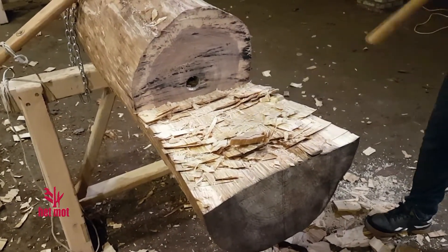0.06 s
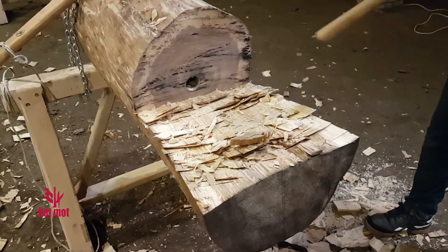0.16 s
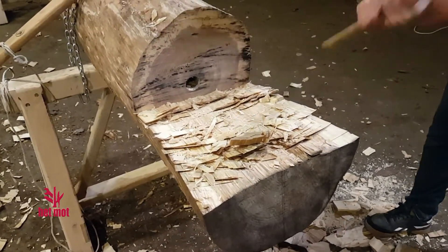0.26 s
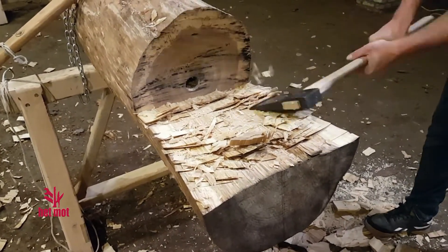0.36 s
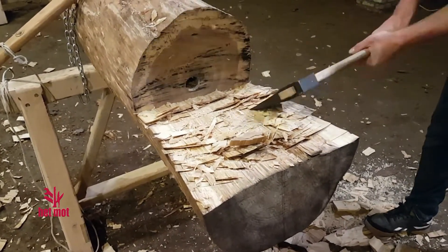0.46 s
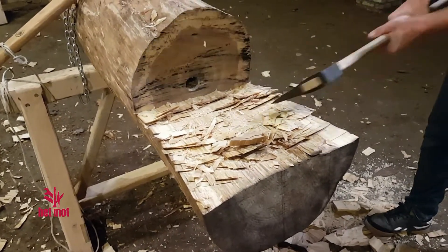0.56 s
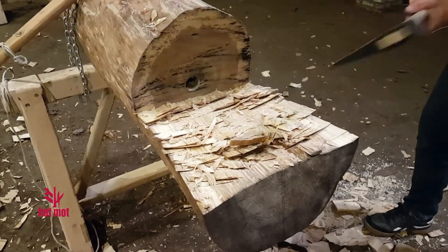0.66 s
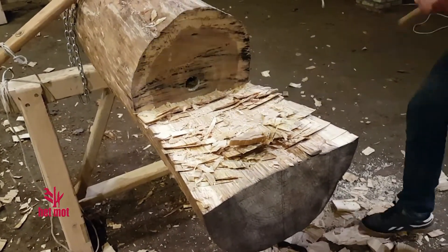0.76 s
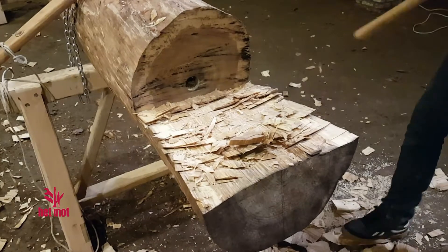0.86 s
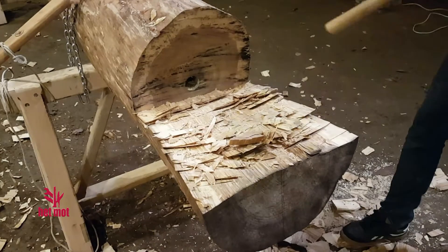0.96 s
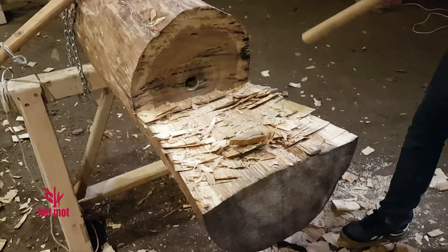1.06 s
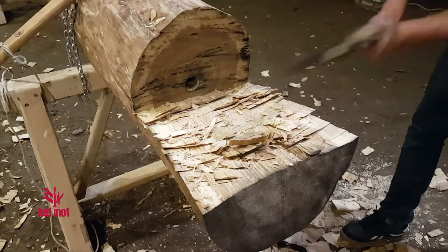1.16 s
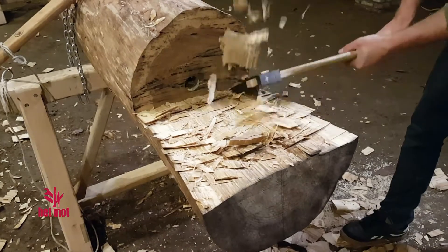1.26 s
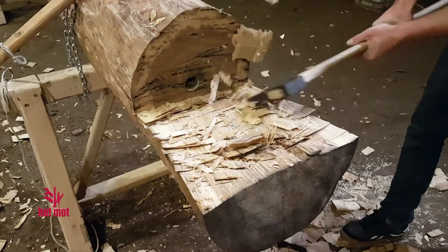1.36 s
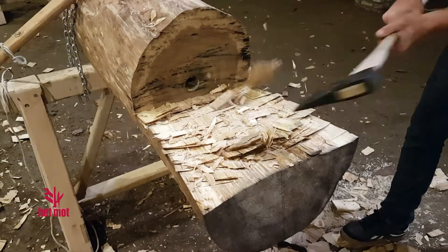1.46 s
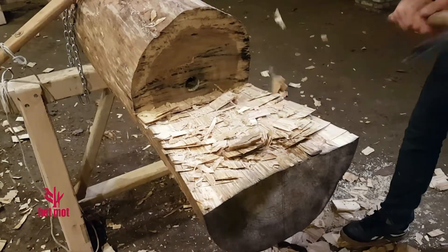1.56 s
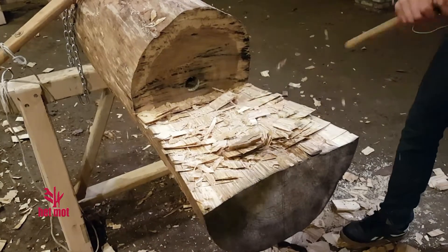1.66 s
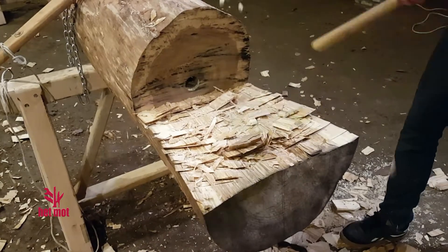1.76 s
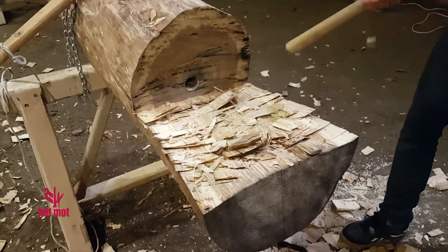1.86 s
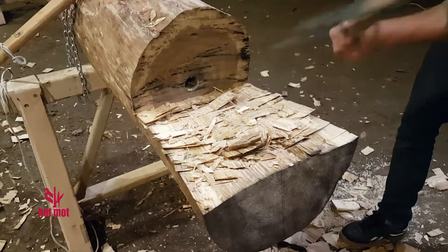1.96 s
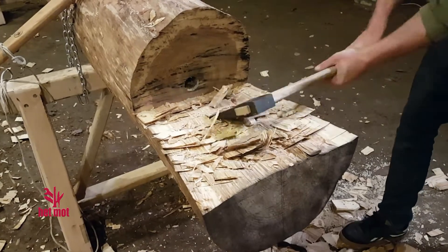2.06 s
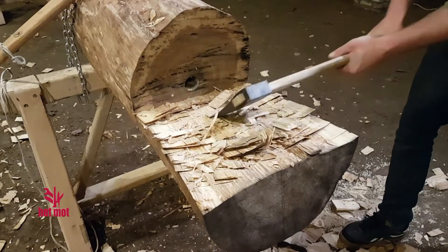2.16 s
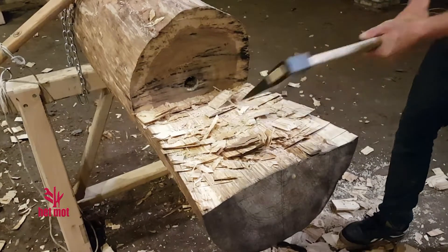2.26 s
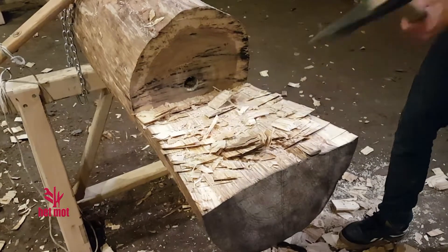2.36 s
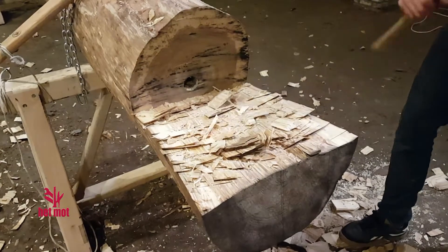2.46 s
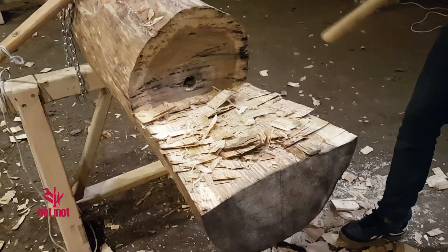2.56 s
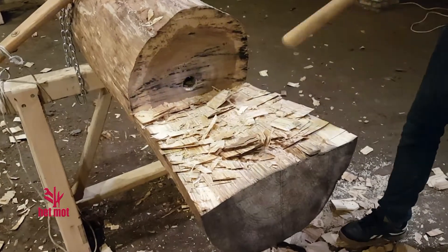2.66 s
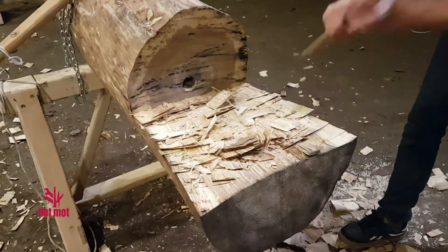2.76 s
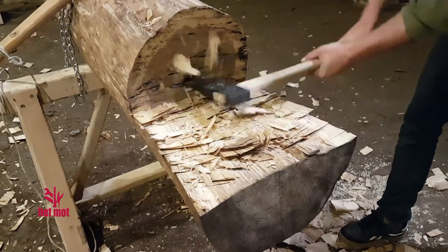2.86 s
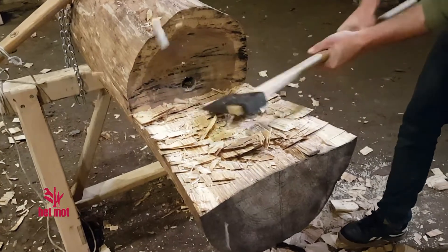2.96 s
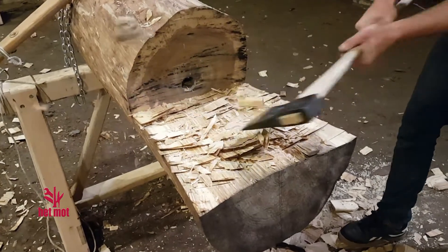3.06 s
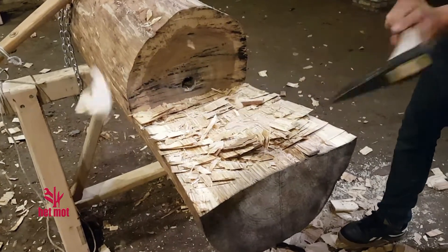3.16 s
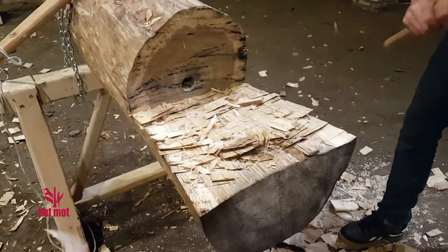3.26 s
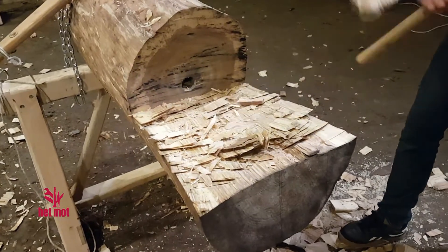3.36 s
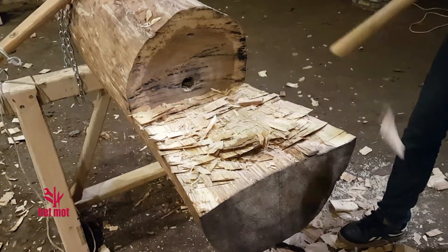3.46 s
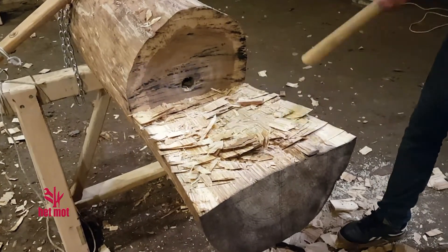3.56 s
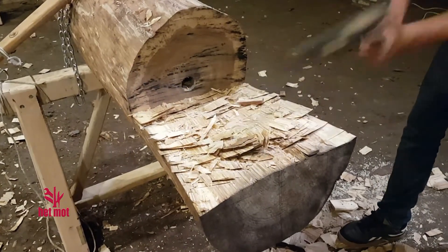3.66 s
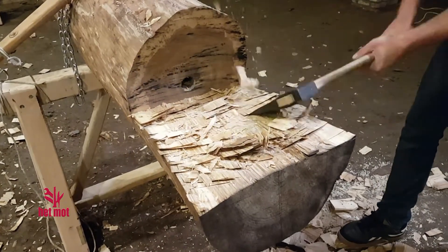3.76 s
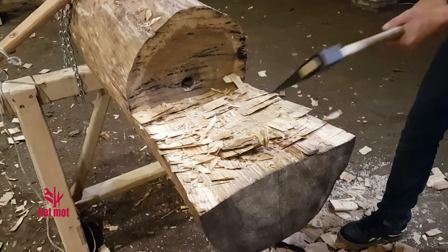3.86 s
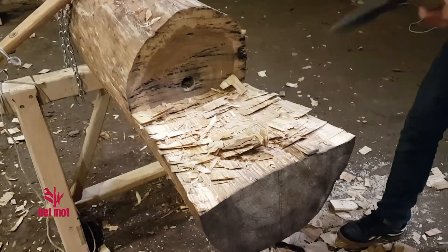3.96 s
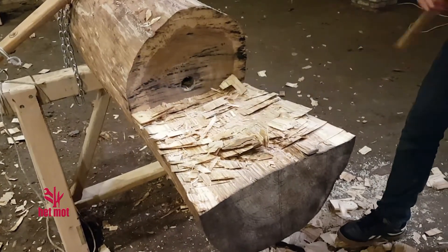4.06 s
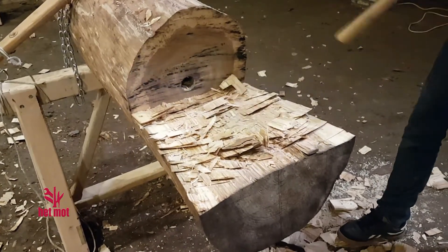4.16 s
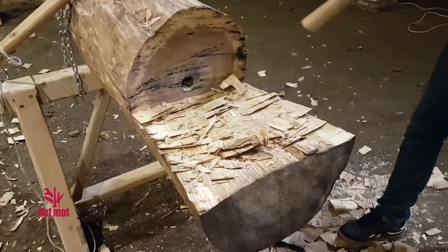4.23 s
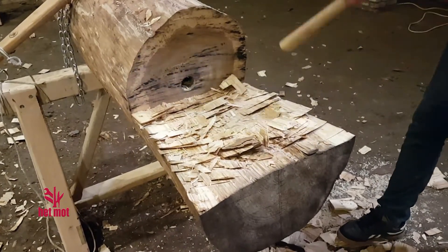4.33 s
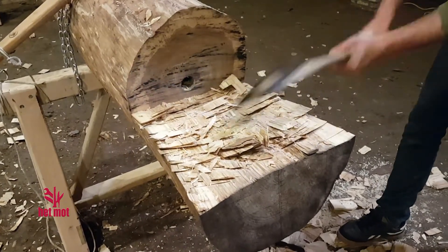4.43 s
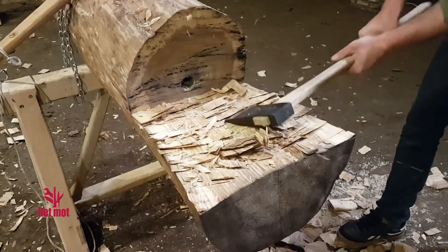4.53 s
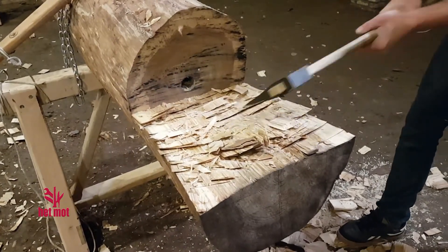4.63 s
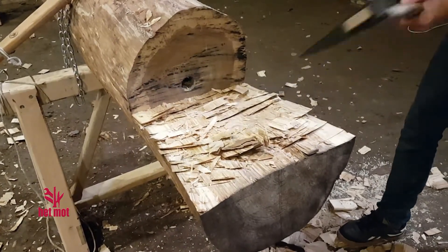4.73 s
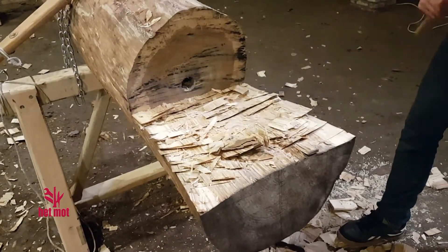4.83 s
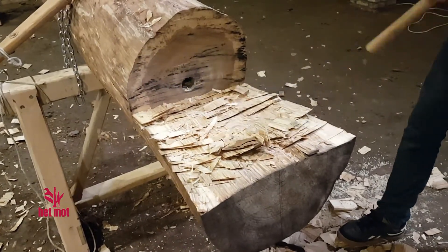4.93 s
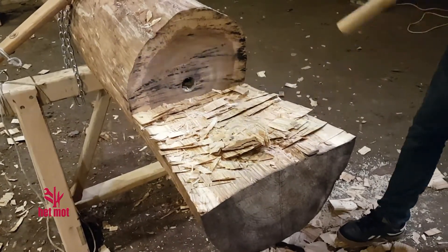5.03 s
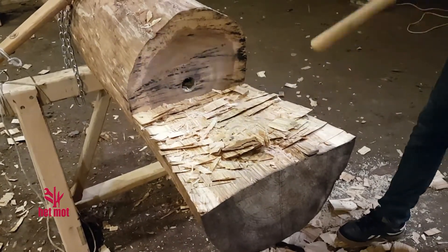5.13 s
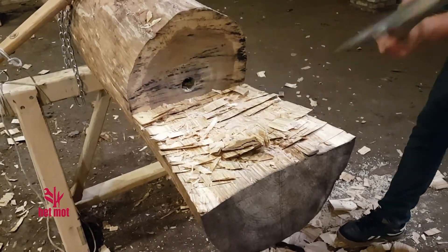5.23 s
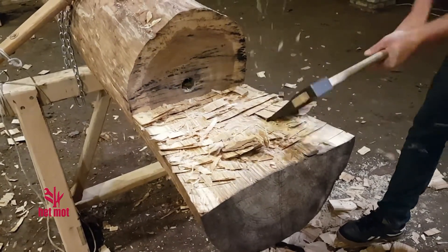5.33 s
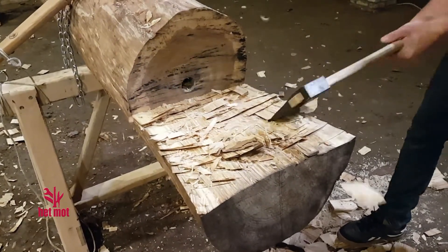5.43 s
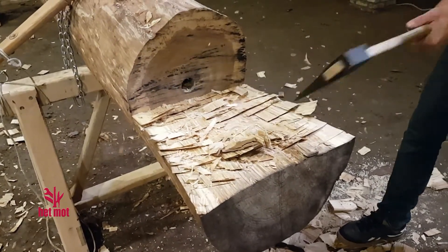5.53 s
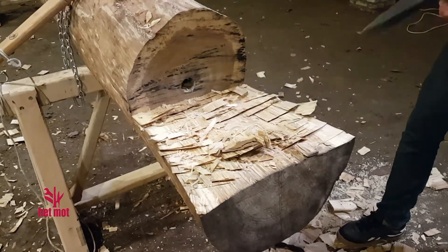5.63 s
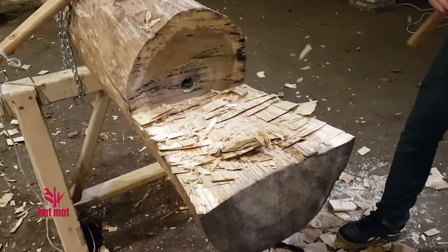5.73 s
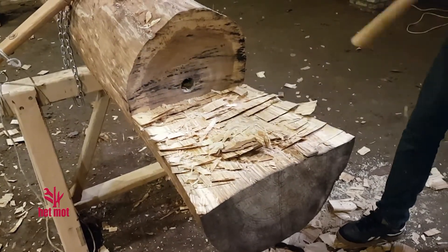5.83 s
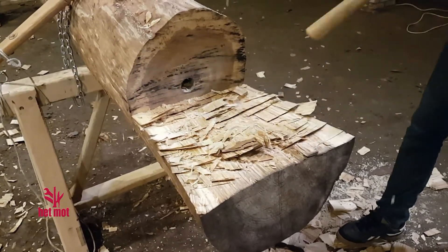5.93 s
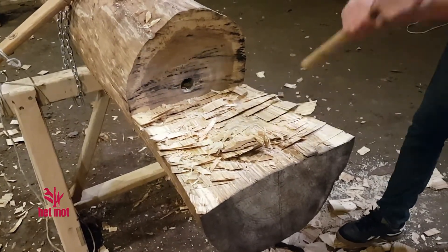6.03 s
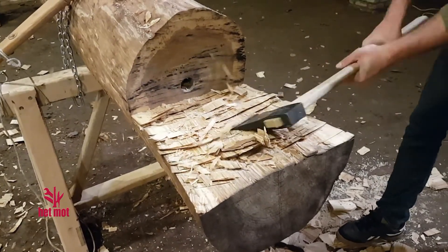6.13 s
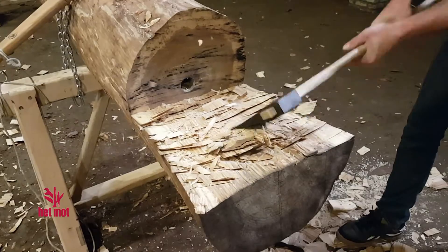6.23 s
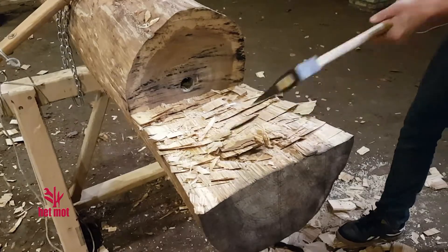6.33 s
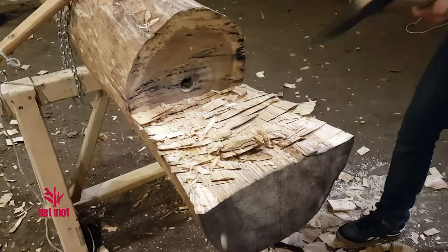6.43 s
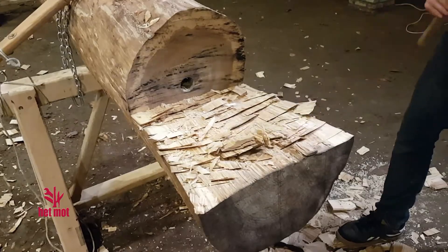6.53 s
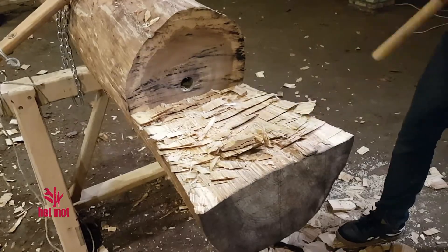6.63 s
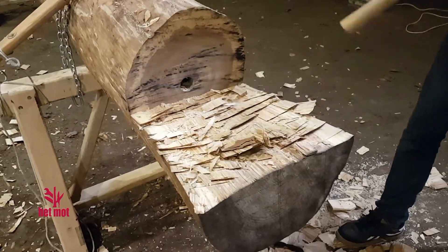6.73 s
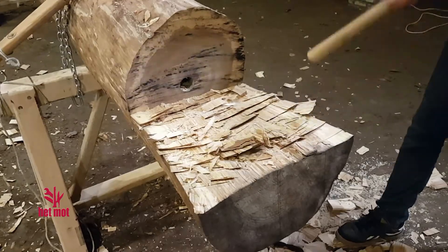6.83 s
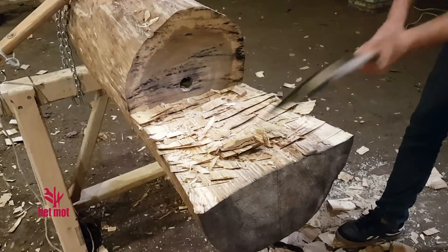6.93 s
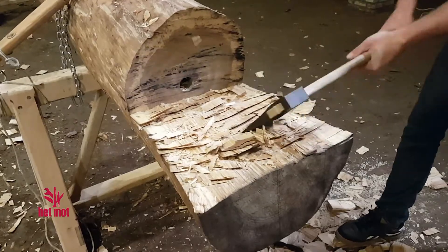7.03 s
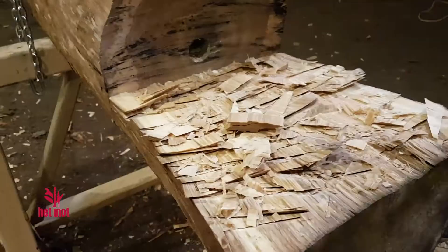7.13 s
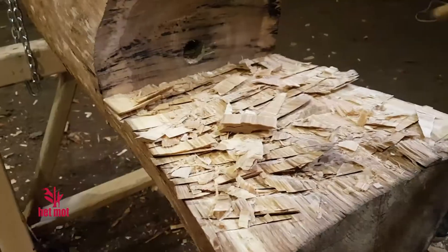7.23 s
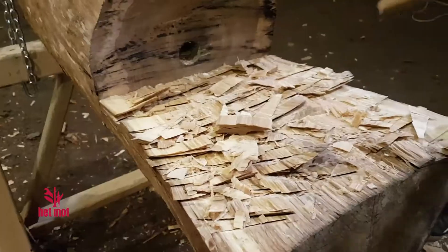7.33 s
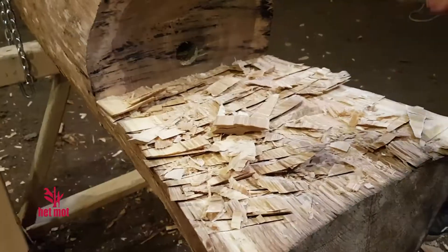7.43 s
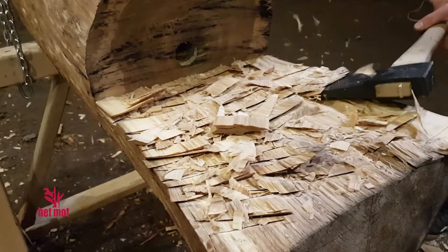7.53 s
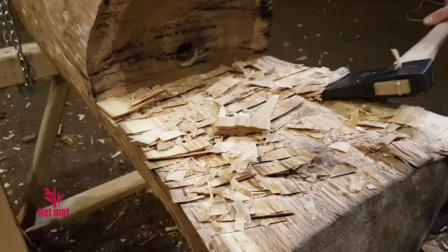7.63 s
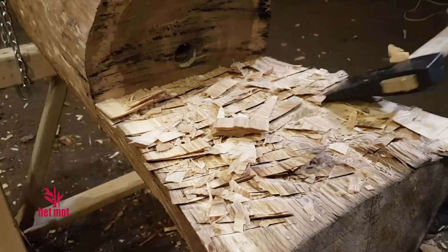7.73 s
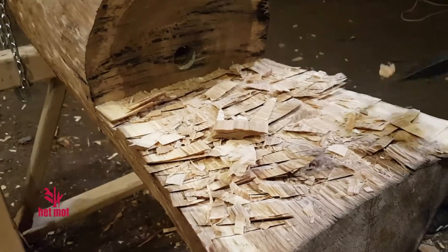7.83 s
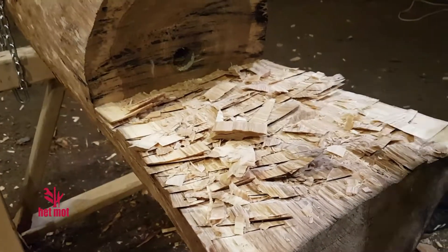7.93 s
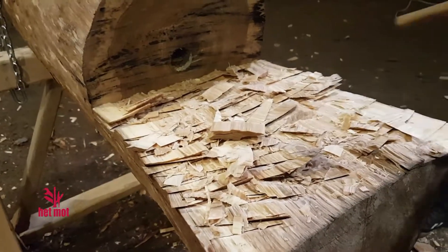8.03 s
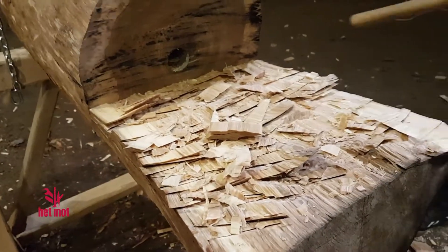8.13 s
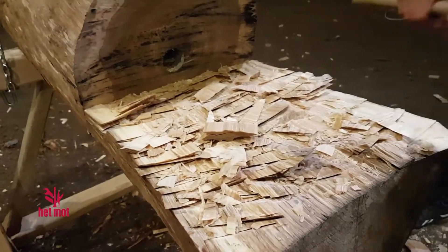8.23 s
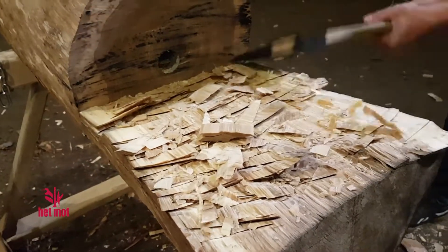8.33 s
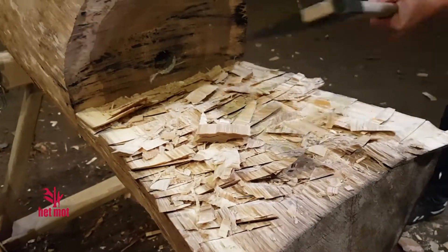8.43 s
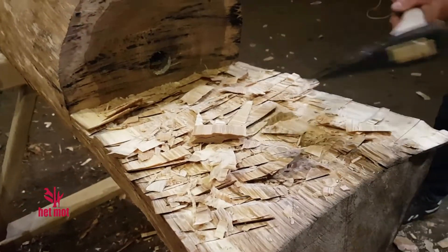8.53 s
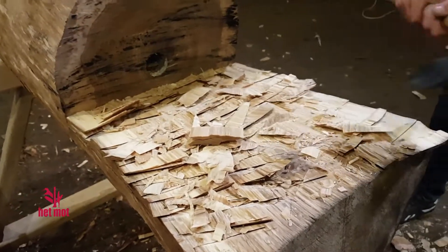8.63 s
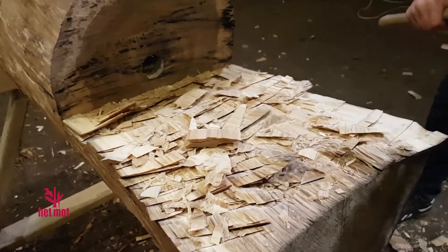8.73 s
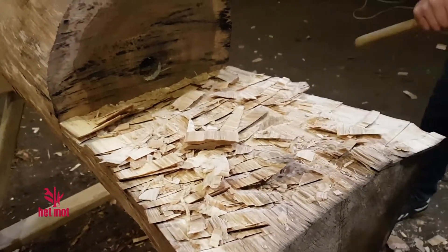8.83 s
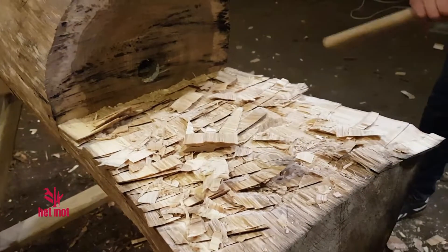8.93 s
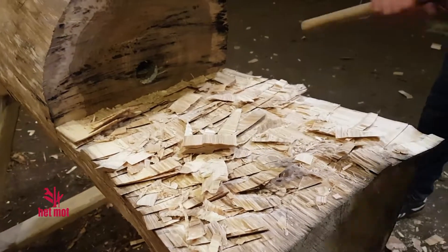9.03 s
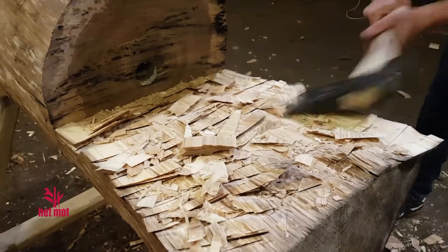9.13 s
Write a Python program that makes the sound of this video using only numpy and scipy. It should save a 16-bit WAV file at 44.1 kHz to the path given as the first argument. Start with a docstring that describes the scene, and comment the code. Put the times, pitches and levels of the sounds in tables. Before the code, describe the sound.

A heavy oak trunk on trestles is hewn with an axe in a workshop, heard in stereo from a short distance. Sharp, fibrous cracks fall at about 0.3, 1.2, 2.0, 2.8, 3.7, 4.5, 5.3, 6.1 and 7.0 s, each with a mid-pitched hollow knock, sometimes a tiny blade ping, and a lively half-second room tail. The 6.1 s blow is the hardest and driest, with little bass. Between them is faint rumble and hiss, a soft low thud at 0.85 s, and light chip clicks, clearest near 1.9, 3.5, 4.3 and 5.8 s. The sound cuts to silence around 7.06-7.13 s. Then, closer, blows land at 7.5, 8.3 and 9.1 s, the middle one led by a weaker, bassy snap just before it. The trunk booms more deeply and the low background rumble is louder, dipping after each blow.

```python
"""Hewing an oak trunk

An axe hews a flat face on an oak trunk that lies on trestles in a workshop.
Each bite is shaped noise (cracking fibres) plus decaying modes (axe, blade, trunk) and reflections.
Chips land and shift as short band-limited noise, with one soft low thud at 0.85 s.
A rumble and hiss lie below and dip at each blow.
After a short silence the work is heard from closer by, with more boom and background rumble."""
import sys
import numpy as np
from scipy import signal
from scipy.fft import rfft, irfft, next_fast_len
from scipy.io import wavfile
from scipy.ndimage import uniform_filter1d

SR = 44100
rng = np.random.default_rng(int(sys.argv[2]) if len(sys.argv) > 2 else 0)


def wav_out(sig):
    """Save sig, one row per channel (or a flat mono array), as 16-bit PCM at SR to the path in sys.argv[1]."""
    wavfile.write(sys.argv[1], SR, np.round(np.clip(np.atleast_2d(sig).T, -1, 1) * 32767).astype(np.int16))


N = 405264

# background from afar, before its dips: start_s, rumble_db, hiss_db
FAR_AIR_LEVELS = [(0, -57.5, -62.5), (1.7, -64.5, -72.5), (5.1, -64.5, -73.5), (6.1, -74.5, -71.5),
                  (7, -68.5, -73.5)]
# background close by, before its dips: start_s, rumble_db, hiss_db
NEAR_AIR_LEVELS = [(7.3, -38, -50), (8.1, -52, -67), (8.5, -33, -48.5), (9.19, -44.5, -60.5)]
# background spectrum from afar: freq_hz, relative_db_per_hz
FAR_AIR_SPECTRUM = [(15, -20), (30, 2.5), (70, 1), (150, -2.5), (290, -1.5), (450, -11.5), (1300, -17.5),
                    (2500, -19), (3800, -24.5), (5500, -24), (7500, -25), (9500, -36), (14000, -45.5),
                    (16000, -61)]
# background spectrum close by: freq_hz, relative_db_per_hz
NEAR_AIR_SPECTRUM = [(15, -27), (25, -22.5), (70, 2), (166, 1.5), (229, -6), (335, -7), (384, -14.5),
                     (796, -15), (1330, -26.5), (4490, -44.5), (7710, -43.5), (11600, -68), (16000, -85)]
# reverberation: freq_hz, t60_s
ROOM_DECAY = [(80, 0.9), (250, .62), (500, 0.43), (1000, 0.49), (2500, 0.48), (5500, .46), (8000, .41),
              (14000, 0.26)]
# colour of the reflections: freq_hz, gain_db
ROOM_SPECTRUM = [(60, 0.5), (300, 8.5), (700, -2), (1500, -1.5), (3000, -1.5), (7000, 2.5), (14000, 5)]
# microphone pair: freq_hz, left_right_likeness (0 to 1)
STEREO_LIKENESS = [(100, 1), (300, .9), (700, 0.67), (1400, 0.1), (2800, 0.48), (6000, 0.1)]
# balance of the blows: freq_hz, left_minus_right_db
STEREO_LEAN = [(70, -1.5), (250, -0.5), (600, 2), (1200, -1), (2300, -2), (4500, -3), (8000, -3.5),
               (13000, 0)]
# chips landing and shifting, with one soft low thud at 0.85 s:
# start_s, level_db, centre_hz, half_width_octaves, decay_s, skitter_db
LITTER_SOUNDS = [(.215, -58, 10000, .4, .003, -19.5), (0.85, -51.5, 218, 1, 0.025, -12.5),
                 (1.133, -57.5, 3200, 0.62, 0.0039, -14), (1.462, -57, 1984, .78, .0042, -15.5),
                 (1.872, -39.5, 1300, 0.98, 0.005, -7.5), (3.272, -49.5, 2987, 0.23, 0.0014, -30.5),
                 (3.425, -61, 3500, 1.14, .0078, -7), (3.539, -45.5, 1983, 2.67, 0.0063, -4.5),
                 (4.197, -56.5, 1970, 0.56, 0.0066, -15.5), (4.286, -46.5, 2483, 0.7, 0.0027, -10.5),
                 (5.815, -38.5, 2200, 1.15, 0.0031, -11.5), (6.087, -55, 750, 0.76, 0.024, -11.5),
                 (7.152, -57.5, 1810, 0.9, 0.0063, -15), (7.967, -65, 4990, .2, .0022, -25)]
# slivers snapping off in a bite: start_s, level_db, centre_hz, half_width_octaves, decay_s, room_db
SPLINTERS = [(1.1827, -12, 1396, 0.53, 0.0022, -25), (2.8354, -13.5, 946, .4, 0.007, -19),
             (6.138, -39.5, 4485, 0.13, 0.0052, 9), (8.282, -21.5, 956, 0.37, 0.001, 4),
             (8.316, -27.5, 3130, 0.076, 0.0044, -23)]
# trunk on its trestles, booming with the shop: freq_hz, level_db, t60_s
TRUNK_MODES = [(87.8, -19.5, 0.81), (148, -7, 0.092), (156.4, -5, 0.17), (213.4, -12.5, .35),
               (231.3, -10, 0.63), (276.3, -2, 0.58), (296.5, -5, 0.33), (323, -8, 0.29), (348, -6.5, .45),
               (445, -12, 0.45), (528, -21.5, 0.65)]
# axe head and haft: freq_hz, relative_db, t60_s
AXE_MODES = [(604, -12.5, 0.16), (677, -12.5, 0.071), (891, 0.5, 0.11), (920, -16, 0.3),
             (970, -15.5, 0.022), (1156, -13, 0.13), (1380, -14.5, 0.087), (1820, -16.5, 0.095),
             (7430, -33, 0.15), (7700, -34.5, 0.11)]
# snapping oak: freq_hz, relative_db_per_hz
CRACK_SPECTRUM = [(40, -23.5), (130, -13.5), (300, -8), (450, -6), (700, 3), (1300, -1), (2000, -7),
                  (3200, -8.5), (4300, -20), (7500, -23.5), (9200, -31.5), (14500, -27), (16500, -52.5)]
# one row a bite: start_s, force_db, bite_decay_s, split_db, bass_push_db, snap_db (near 1.9 kHz),
# brightness_db, axe_knock_db, blade_ping_db; push, snap and brightness are weighted by frequency
BLOWS = [(0.3261, -9, 0.0048, -11.5, 5.5, 1, 1, -9.5, -11),
         (1.1747, -7.5, 0.007, -6, 4, 4, -0.5, -8.5, -30.5),
         (1.9891, -9, 0.0029, -8.5, 0, -3, 0.5, -10, -21),
         (2.8098, -9.5, 0.0082, -10, 3.5, -1, 0, -9, -9.5),
         (3.6730, -8, 0.0052, -13, 0, 3, -2.5, -10.5, -13),
         (4.4730, -8.5, 0.0032, -8.5, -3, 0.5, -3, -10, -31.5),
         (5.2966, -10, 0.0037, -15.5, 7.5, 2.5, 7, -24, -14.5),
         (6.1425, -4.5, 0.0017, -13, -14.5, 5.5, -4.5, -14, -25.5),
         (6.976, -11, 0.0021, 2, 3.5, 0, -0.5, -10.5, -39),
         (7.4786, -7.5, 0.0066, -10, 3.5, 8.5, -1, -9, -27.5),
         (8.2765, -18.5, 0.0064, 0.5, 17.5, -2, 7, -13, -38),
         (8.3288, -10, 0.0022, -10, 4.5, 2, -10.5, -9, -16.5), (9.1380, -10, .004, -27, 8.5, 4, -3, -8, -9)]
# silence between the stretches: start_s, end_s
SILENCE = (7.063, 7.135)
SILENCE_START_S, SILENCE_END_S = SILENCE

TIME_S = np.arange(N) / SR
AGE_S = np.arange(SR) / SR  # each event lasts 1 s, so its spectrum has 1 Hz bins

DIP_DB, RECOVER_DB_PER_S = 14, 16
LITTER_ROOM_DB = -7
SKITTER_DECAY_S, SKITTER_HZ, SKITTER_HALF_WIDTH_OCTAVES = 0.1, 2700, 0.75
# reflections against the direct sound of an ordinary blow
FAR_ROOM_DB, NEAR_ROOM_DB = -4, -7.5
# a harder crack stands further out of the room
USUAL_FORCE_DB, DRYING_DB_PER_DB = -9.5, 0.8
# the trunk booms more close by, and more the deeper the push
FAR_THUD_DB, NEAR_THUD_DB, THUD_DB_PER_PUSH_DB = -26, -17, 0.5
THUD_DELAY_S = 0.015
BLADE_HZ = 3142
FADE_S = 0.004
BAND_LIMIT_HZ = 16300


def amp(db):
    """Decibels to gain."""
    return 10 ** (np.asarray(db) / 20)


def unit(x):
    """Scales a short sound to the energy of 10 ms at full level."""
    energy = np.mean(np.sum(x ** 2, -1))
    return x * np.sqrt(SR / 100 / (energy + 1e-20))


def read(points, hz):
    """Reads a curve on a log-frequency axis."""
    f, value = np.transpose(points)
    return np.interp(np.log(hz + 1), np.log(f + 1), value)


def bins(size):
    """Frequencies of a spectrum."""
    return np.fft.rfftfreq(size, 1 / SR)


def add(mix, start_s, sound):
    """Mixes a sound in at its start time, cut at the end of the mix."""
    part = mix[:, round(start_s * SR):][:, :sound.shape[-1]]
    part += sound[..., :part.shape[-1]]


def colour(x, db):
    """Causal minimum-phase filter, its cepstrum folded onto positive time."""
    log_gain = np.log(amp(np.maximum(db, -100)))
    cepstrum = irfft(log_gain)
    half = cepstrum.shape[-1] // 2
    cepstrum[..., 1:half] *= 2
    cepstrum[..., half + 1:] = 0
    return irfft(rfft(x) * np.exp(rfft(cepstrum)))


def band(centre_hz, half_width_octaves):
    """Gain in dB of a flat-topped band, -3 dB at the half width."""
    octaves = np.log2((bins(SR) + 1) / centre_hz)
    return -10 * np.log10(1 + (octaves / half_width_octaves) ** 4)


def pair(x):
    """Two unrelated signals become a microphone pair: alike in the bass, apart in the treble."""
    same = np.clip(read(STEREO_LIKENESS, bins(x.shape[-1])), -1, 1)
    mid, side = rfft(x) * np.sqrt([1 + same, 1 - same]) / np.sqrt(2)
    return irfft([mid + side, mid - side])


def burst(decay_s, grain_db, blur_hz=330):
    """A dying cluster of tiny grains of noise of uneven size, even in colour overall."""
    grain = 30  # samples a grain
    sizes_db = grain_db * np.minimum(rng.exponential(1, SR // grain + 1), 4)
    sizes = amp(sizes_db).repeat(grain)[:SR]
    x = pair(rng.standard_normal((2, SR))) * sizes * np.exp(-AGE_S / max(decay_s, 1e-4))
    # flatten the blurred spectrum
    power = (abs(rfft(x)) ** 2).mean(0)
    blurred = uniform_filter1d(power, max(int(blur_hz), 1))
    return unit(colour(x, -10 * np.log10(blurred + 1e-9)))


def ring(modes, rise_s, detune, spread_rad):
    """Decaying modes, a little different at each strike and at each microphone."""
    out = np.zeros((2, SR))
    for hz, db, t60_s in modes:
        shift, left, right = rng.standard_normal(3)
        phase = spread_rad * np.array([[left], [right]])
        tone = np.sin(2 * np.pi * hz * (1 + detune * shift) * AGE_S + phase)
        out += amp(db - 60 * AGE_S / t60_s) * tone
    return out * (1 - np.exp(-AGE_S / rise_s))


def air(levels, spectrum, split_hz=800):
    """Background rumble and hiss: coloured noise split in two, each on its slow swell."""
    point_s, *curves_db = np.transpose(levels)
    size = next_fast_len(N, real=True)
    size += size % 2
    hz = bins(size)
    z = rfft(pair(rng.standard_normal((2, size)))) * amp(read(spectrum, hz))
    low = 1 / (1 + (hz / split_hz) ** 4)
    rumble = irfft(z * low)[:, :N]
    hiss = irfft(z * (1 - low))[:, :N]
    out = np.zeros((2, N))
    for part, db in zip((rumble, hiss), curves_db):
        out += part / part.std() * amp(np.interp(TIME_S, point_s, db))
    return out


def dips():
    """Gain of the background: down at each blow, then a steady climb back in dB."""
    db = np.zeros(N)
    for start_s, *_ in BLOWS:
        climb_db = np.minimum(RECOVER_DB_PER_S * (TIME_S - start_s) - DIP_DB, 0)
        db = np.where(TIME_S < start_s, db, climb_db)
    return amp(db)


def workshop(x, first_s=0.0026, build_s=0.0027):
    """Dense reflections that build up after the first wall, with a decay time for each frequency."""
    sparse = rng.random((2, SR)) < 0.15
    taps = pair(rng.standard_normal((2, SR)) * sparse)
    hz, t, z = signal.stft(taps, SR, nperseg=256)
    decay_db = 60 * t / read(ROOM_DECAY, hz)[:, None]
    z = z * amp(read(ROOM_SPECTRUM, hz)[:, None] - decay_db)
    tail = signal.istft(z, SR, nperseg=256)[1][:, :SR]
    tail = tail * (1 - np.exp(-np.maximum(AGE_S - first_s, 0) / build_s))
    return signal.fftconvolve(x, tail / np.linalg.norm(tail[0]), axes=1)[:, :SR]


def tick(level_db, centre_hz, half_width_octaves, decay_s, room_db):
    """A short dying burst of noise in its own band, plus reflections."""
    rattle = colour(burst(decay_s, grain_db=3), band(centre_hz, half_width_octaves))
    direct = amp(level_db) * unit(rattle)
    return direct + amp(room_db) * workshop(direct)


def litter(level_db, centre_hz, half_width_octaves, decay_s, skitter_db):
    """A chip lands or shifts, or a soft low thud falls: a tick over a longer, fainter skitter."""
    hit = tick(level_db, centre_hz, half_width_octaves, decay_s, LITTER_ROOM_DB)
    skitter = tick(level_db + skitter_db, SKITTER_HZ, SKITTER_HALF_WIDTH_OCTAVES,
                   SKITTER_DECAY_S, LITTER_ROOM_DB)
    return hit + skitter


def trunk(rattle_db=-7, rattle_hz=200):
    """The heavy trunk booms in its modes and rattles as it rocks on the trestles."""
    shake = burst(0.041, grain_db=2.0, blur_hz=40.44).mean(0)
    # band applied twice over: steeper skirts
    rattle = unit(colour(shake, 2 * band(rattle_hz, half_width_octaves=0.74)))
    boom = ring(TRUNK_MODES, rise_s=0.0038, detune=0.0072, spread_rad=0.18)
    return boom + amp(rattle_db) * rattle


def axe_knock(knock_db):
    """Axe head and haft ring in their modes."""
    return amp(knock_db) * ring(AXE_MODES, rise_s=0.0006, detune=0.0097, spread_rad=0.22)


def blade_ping(ping_db):
    """The blade rings briefly in three close modes."""
    modes = [(BLADE_HZ, ping_db, 0.035),
             (BLADE_HZ * 0.95, ping_db - 5, 0.025),
             (BLADE_HZ * 1.05, ping_db - 5.5, 0.02)]
    return ring(modes, rise_s=0.00023, detune=0.022, spread_rad=0.81)


def oak_crack(force_db, bite_decay_s, split_db, push_db, snap_db, bright_db, edge_db=-2):
    """Fibres fracture in three bursts; depth of cut and size of chip set their colour."""
    hz = bins(SR)
    tone_db = read(CRACK_SPECTRUM, hz)
    # weights: freq_hz, db_per_db
    tone_db = tone_db + push_db * read([(220, 0.77), (600, 0.094)], hz)
    tone_db = tone_db + snap_db * read([(1050, 0.038), (1850, 0.99), (3300, 0)], hz)
    tone_db = tone_db + bright_db * read([(1100, 0.0095), (3500, 0.88)], hz)
    contact = amp(edge_db) * burst(0.0012, grain_db=1.0)
    crushed = burst(bite_decay_s, grain_db=3)
    split = amp(split_db) * burst(0.033, grain_db=5.5)  # runs along the grain
    return amp(force_db) * unit(colour(contact + crushed + split, tone_db))


def blow(near, force_db, bite_decay_s, split_db, push_db, snap_db, bright_db, knock_db, ping_db):
    """The edge cracks into the oak, the chip tears on, and axe and trunk ring."""
    room_db = NEAR_ROOM_DB if near else FAR_ROOM_DB
    room_db -= DRYING_DB_PER_DB * max(force_db - USUAL_FORCE_DB, 0)
    thud_db = NEAR_THUD_DB if near else FAR_THUD_DB
    thud_db += THUD_DB_PER_PUSH_DB * push_db
    crack = oak_crack(force_db, bite_decay_s, split_db, push_db, snap_db, bright_db)
    knock = axe_knock(knock_db)
    ping = blade_ping(ping_db)
    reflections = workshop(crack + 0.69 * knock + 0.55 * ping)
    out = crack + knock + ping + amp(room_db) * reflections
    add(out, THUD_DELAY_S, amp(thud_db) * trunk())
    # half the lean to each side
    return colour(out, read(STEREO_LEAN, bins(SR)) * np.array([[0.5], [-0.5]]))


def scene():
    """Two stretches of hewing, from afar and close by, parted by a short silence."""
    background_gain = dips()
    far = background_gain * air(FAR_AIR_LEVELS, FAR_AIR_SPECTRUM)
    near = background_gain * air(NEAR_AIR_LEVELS, NEAR_AIR_SPECTRUM)
    for source, table in (litter, LITTER_SOUNDS), (tick, SPLINTERS):
        for start_s, *row in table:
            add(far if start_s < SILENCE_START_S else near, start_s, source(*row))
    for start_s, *row in BLOWS:
        close = start_s > SILENCE_START_S
        add(near if close else far, start_s, blow(close, *row))
    fade_out = np.clip((SILENCE_START_S - TIME_S) / FADE_S + 1, 0, 1)
    fade_in = np.clip((TIME_S - SILENCE_END_S) / FADE_S, 0, 1)
    return far * fade_out + near * fade_in


def record(dry):
    """Rounds off the loudest peaks, then limits the band with a linear-phase low-pass."""
    held = dry / (1 + (dry / 0.95) ** 4) ** 0.25
    low_pass = signal.firwin(255, BAND_LIMIT_HZ, window=("kaiser", 9), fs=SR)
    return signal.oaconvolve(held, low_pass[None], "same")


dry = scene()
out = record(dry)
wav_out(out)
```